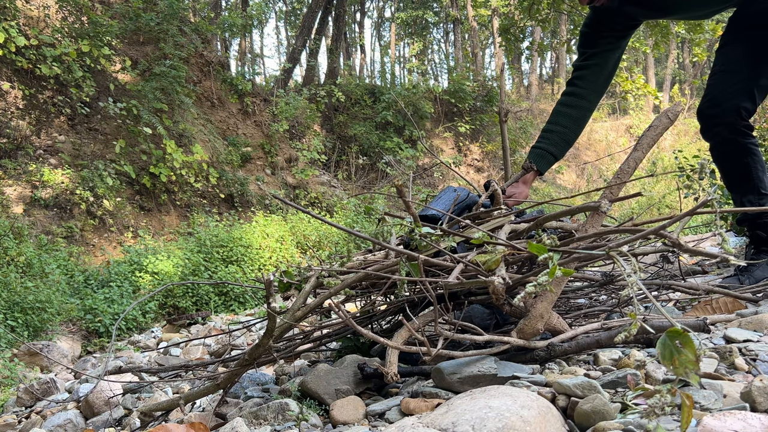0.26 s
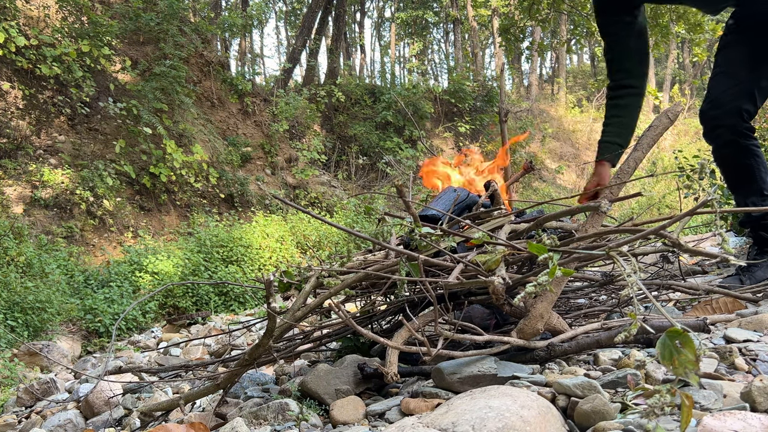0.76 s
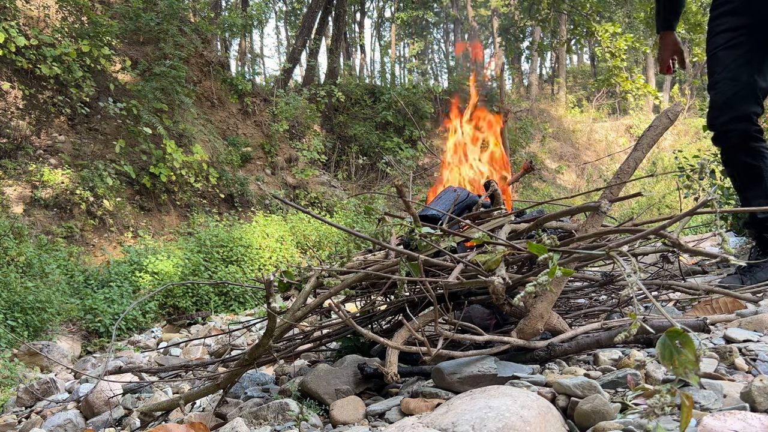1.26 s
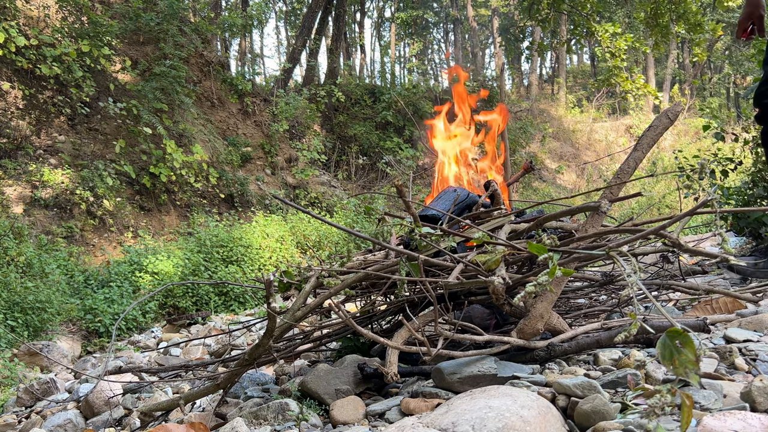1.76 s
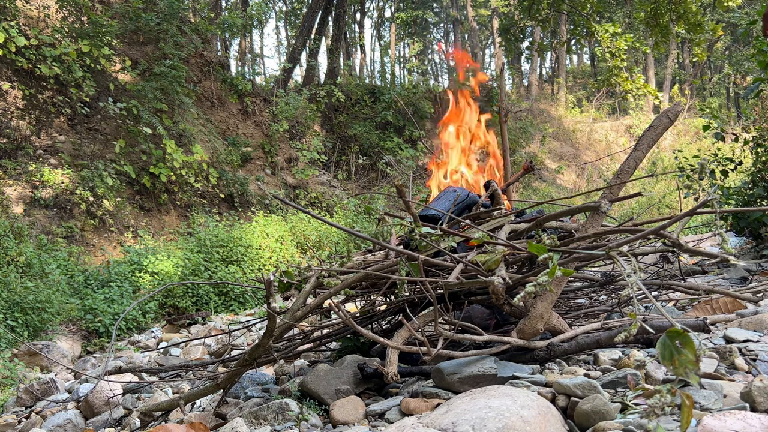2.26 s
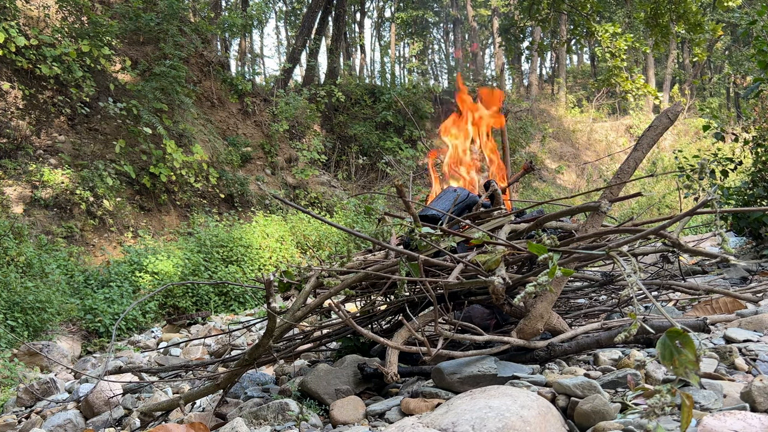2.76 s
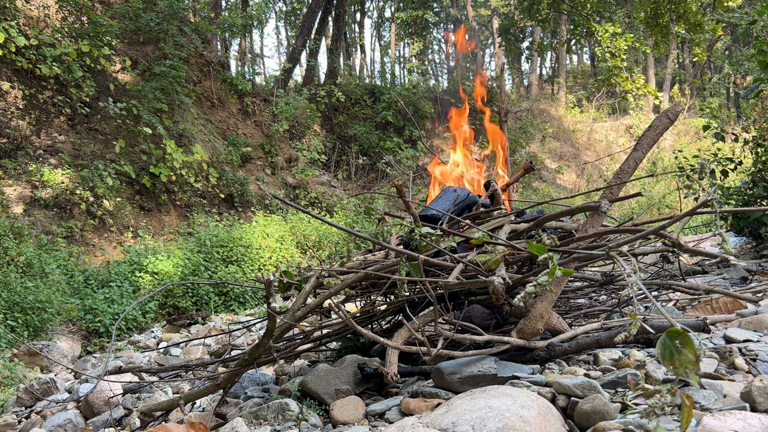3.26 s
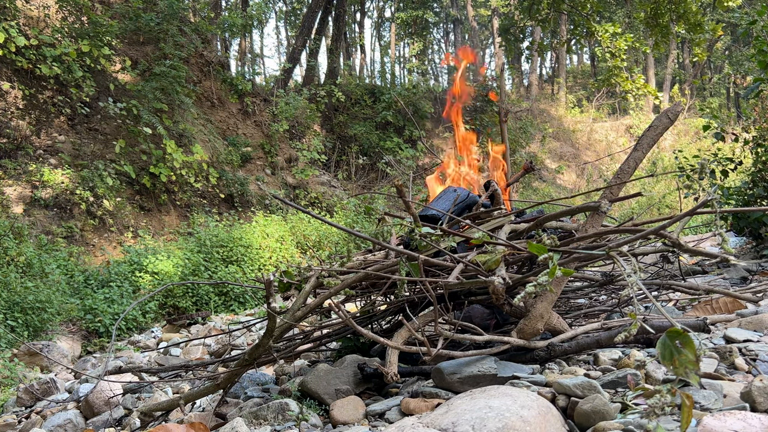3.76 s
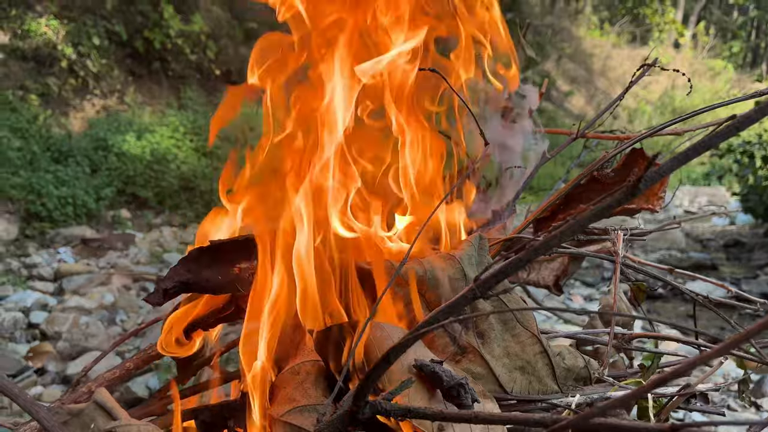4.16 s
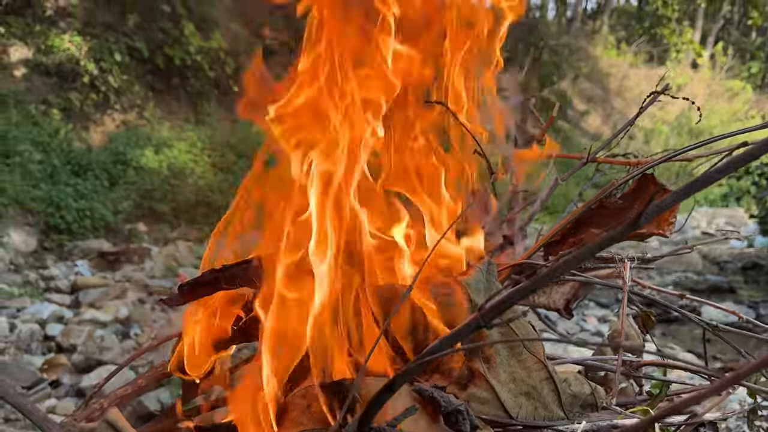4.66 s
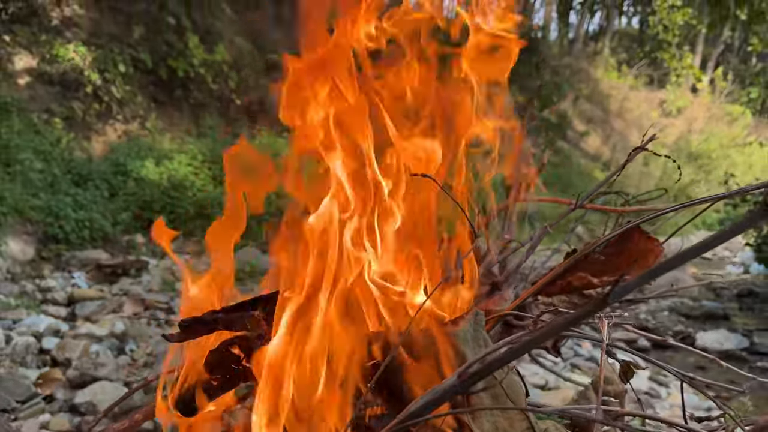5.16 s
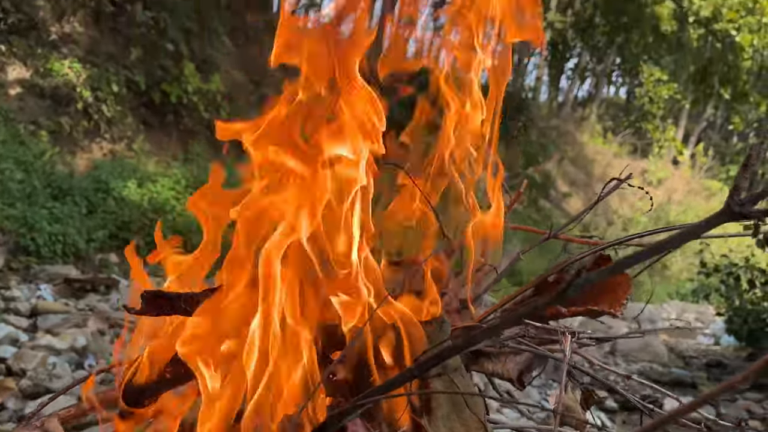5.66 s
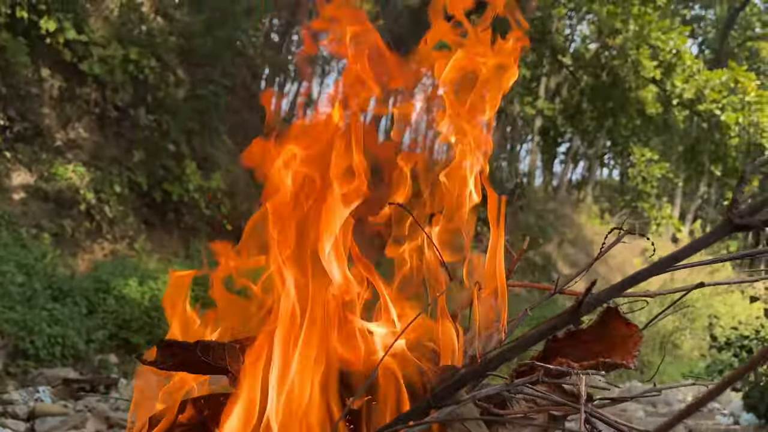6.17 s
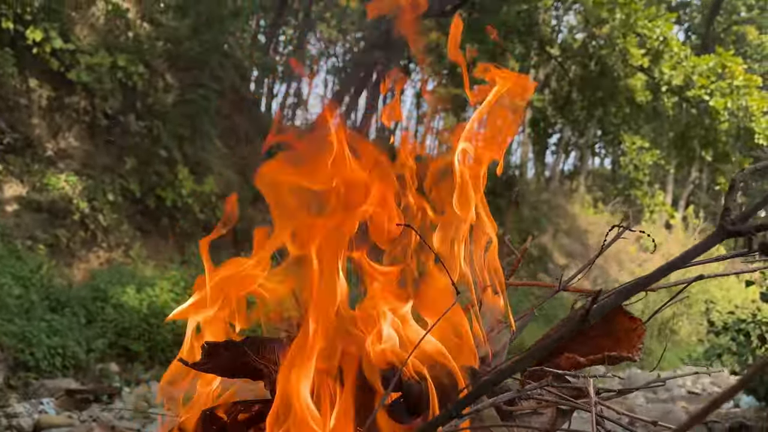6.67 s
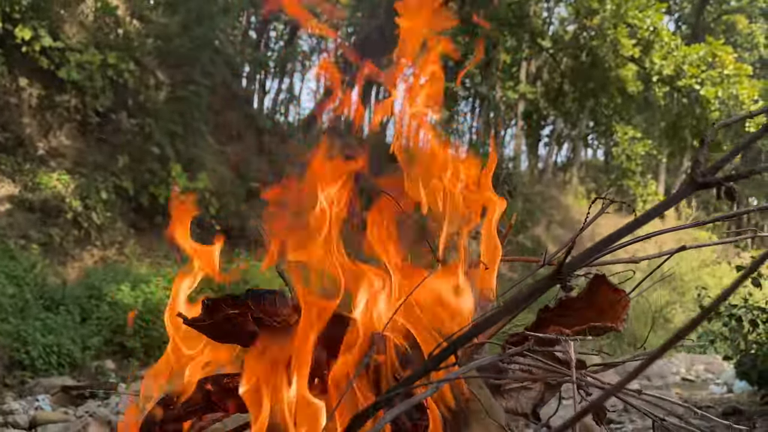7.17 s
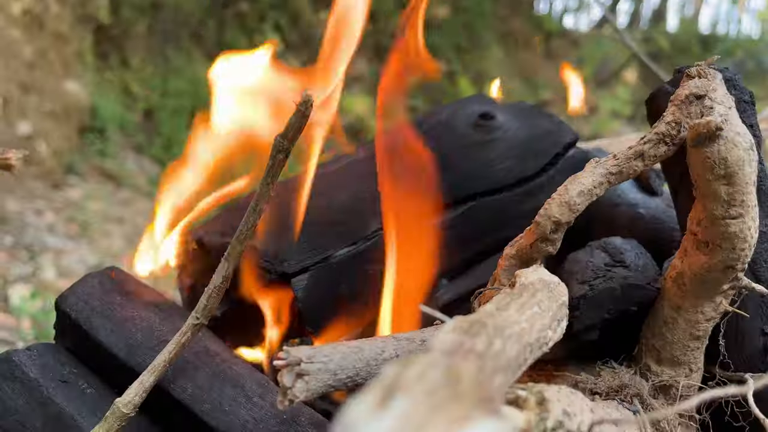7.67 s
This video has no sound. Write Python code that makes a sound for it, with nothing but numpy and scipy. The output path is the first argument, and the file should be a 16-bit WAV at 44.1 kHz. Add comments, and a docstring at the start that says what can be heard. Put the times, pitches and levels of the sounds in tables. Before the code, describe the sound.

In a stony wooded gully, a lighter snaps with a gas hiss and the fuel catches in a soft low whoof. Feet knock stones, a tiny metal clink sounds, and sparse ticks dot a quiet flutter heard from a distance. Then the microphone is abruptly close: full rushing flames and dense, sharp popping, with a last moment of lower, softer fluttering among embers.

```python
"""A stony gully with an earth bank and trees: a heap of dry branches is lit with a lighter.
The lighter clicks and its gas hisses, the fuel puffs alight, feet knock stones, and a metal part clinks in a whistle.
The microphone stands back, then close to the blaze, and last among the embers.
Flames are four layers of shaped noise; twigs pop, tick and toot as short noise bursts, stones ring as damped sines.
The bank throws each pop back a few milliseconds later, and the trees add a short tail."""
import sys
import numpy as np
from scipy import signal
from scipy.fft import rfft, irfft, next_fast_len
from scipy.io import wavfile
from scipy.ndimage import uniform_filter1d, map_coordinates

SR = 44100
rng = np.random.default_rng(int(sys.argv[2]) if len(sys.argv) > 2 else 0)


def file_out(sig):
    """Save sig as 16-bit WAV at sys.argv[1]."""
    # one column per channel
    cols = np.atleast_2d(sig).T
    # limit, then scale
    lim = np.clip(cols, -1, 1)
    pcm = np.round(lim * 32767).astype(np.int16)
    wavfile.write(sys.argv[1], SR, pcm)


N = 349272

# Relative noise colours of the flame layers: [f/Hz, power density/dB]
ROAR_COLOUR = [(15, -82), (25, -17), (52, -4.5), (70, 0), (156, -11.5), (300, -21), (390, -27), (660, -120)]
FLUTTER_COLOUR = [(110, -33), (180, 3), (319, -3.5), (404, -0.5), (813, -9.5), (1200, -21), (1560, -30.5),
                  (2640, -120)]
EMBER_FLUTTER_COLOUR = [(90, -29), (150, -0.5), (430, -5.5), (900, -10.5), (1600, -16), (2000, -27),
                        (3400, -57), (5700, -120)]
RUSH_COLOUR = [(530, -32), (900, -7), (1050, 0), (1590, -0.5), (2620, -7), (5000, -29.5), (6500, -44),
               (11000, -120)]
FAR_HISS_COLOUR = [(1470, -34), (2500, -1), (6100, -2), (7860, -6), (8980, -9.5), (13700, -6.5),
                   (14700, -20), (16500, -28)]
NEAR_HISS_COLOUR = [(1470, -13), (2500, 6.5), (5050, 8.5), (8170, -7), (8980, 3.5), (12600, -2), (14800, 0),
                    (15600, -22), (16500, -49)]
# How the fire burns, before puff, swells and wobble: [t/s, roar level/dB, hiss level/dB]
FIRE_LEVELS = [(0, -68, -79.5), (.3, -67, -73), (.65, -56, -75.5), (.9, -60.5, -73.5), (1.12, -58, -74),
               (1.27, -60.5, -74), (1.52, -56, -72), (2.0, -59.5, -75.5), (2.6, -58, -72), (3.4, -60, -78),
               (3.84, -61, -69.5), (3.86, -41.5, -62.5), (3.93, -38.5, -55.5), (4.1, -43.5, -58),
               (4.37, -40.5, -57.5), (4.6, -46, -56), (4.8, -46, -55.5), (5.2, -45.5, -55.5),
               (5.7, -45.5, -54), (6.2, -49.5, -54.5), (6.4, -48.5, -55), (6.8, -47, -55), (7.0, -47, -58),
               (7.3, -49, -57.5), (7.68, -48.5, -55.5), (7.7, -44, -58), (7.75, -47, -56), (7.83, -40, -60),
               (7.92, -50, -57.5)]
# Rows afar, close, among the embers: [usual hiss level/dB, flutter level/dB, rush level/dB]
PLACE_LEVELS = [(-73, -65, -68), (-55, -52.5, -55.5), (-53.5, -44.5, -59.5)]
# The flutter swells or sinks briefly: [middle t/s, gain/dB, half length/s]
FLUTTER_SWELLS = [(0.101, 1.5, 0.036), (0.71, 3.5, 0.063), (1.026, 13, 0.061), (1.148, 11, 0.054),
                  (1.36, 14, 0.12), (1.835, 9, 0.13), (2.225, 10, 0.056), (2.452, 4, 0.041),
                  (2.62, 3.5, 0.062), (3.08, 4.5, 0.18), (4.388, 3.5, 0.071), (5.28, 4, 0.087),
                  (5.262, 6, 0.02), (5.735, 5.5, 0.22), (5.543, -1.5, 0.028), (6.368, -12, 0.036),
                  (6.448, 5, .05), (6.65, -5.5, 0.13), (7.14, -5, 0.048), (7.186, 2, 0.019),
                  (7.368, -1.5, 0.03), (7.696, -8, 0.026)]

# Likeness of the two channels: [f/Hz, correlation 0-1]
STEREO_LIKENESS = [(60, 1), (250, 0.85), (500, 0.45), (1000, 0.29), (3000, 0.057), (8000, 0.46),
                   (13000, 0.67)]
# Close to the fire the left channel leads: [f/Hz, phase/rad]
NEAR_LEAD = [(30, 0), (300, .3), (700, 1), (1290, 2.2), (1890, 3.8), (2330, 4.1), (2840, 2.7), (3360, 2.9),
             (4740, 8.5), (6980, 11.3), (8100, 9.3), (10800, 6.8), (13000, 5.6), (15100, 3.2)]
# Left-right lean of the flames at close range: [f/Hz, level difference/dB]
FLAME_LEAN = [(60, -1), (180, -0.5), (550, 1), (1650, -0.5), (4970, 5), (15000, -3)]

# A faint thin whistle around the clink: [f/Hz, level/dB, middle t/s, half length/s]
WHISTLE_TONES = [(3570, -77, 2.24, .16), (7000, -74, 2.27, .08)]
# Stones knock underfoot: [t/s, relative level/dB, f/Hz, t60/s]
STONE_KNOCKS = [(1.112, -35.5, 215, 0.02), (1.173, -45, 213, 0.054), (1.283, -23.5, 330, 0.027),
                (2.2, -43, 193, 0.063), (2.239, -40, 434, 0.022), (3.013, -39.5, 321, 0.042),
                (3.112, -46.5, 347, 0.036)]
# Modes of a small metal part: [f/Hz, level/dB, t60/s]
CLINK_MODES = [(3440, -65, 0.083), (6820, -50, 0.1), (8200, -56, .03), (10830, -42, 0.042),
               (11700, -47, 0.033)]
# Modes of the lighter's plastic shell: [f/Hz, level/dB, t60/s]
SHELL_MODES = [(2190, -24.5, 0.011), (5020, -46, 0.068)]
# The lighter's gas, levels relative:
# [crack level/dB, brightness/dB, body level/dB, body f/Hz, left-right/dB]
GAS_BURST = (-63.5, -8.5, -39, 2000, -8)
# Resonances of a hollow twig, before the pitch ratio: [f/Hz, width/Hz, relative level/dB]
TWIG_RESONANCES = [(787, 55, 6), (940, 180, 4.5), (1220, 24, 4.5)]
# Steam toots: [t/s, level/dB, half length/s, pitch ratio]
STEAM_TOOTS = [(4.855, -34, 0.017, 0.99), (5.249, -39.5, 0.015, 0.93), (5.262, -42, 0.037, 2.47),
               (5.441, -40.5, 0.041, 1.45), (5.586, -41, 0.0064, 1.38)]
# The lighter's click, then bursting wood cells, levels relative:
# [t/s, crack level/dB, brightness/dB, body level/dB, body f/Hz, left-right/dB]
CLICK_AND_POPS = [(0.3109, -32.5, -3.5, 4, 2600, -4.5), (0.6319, -51.5, 4, 5, 2600, -3),
                  (0.932, -54, -1, -19, 1800, -1), (0.9549, -46, -9, -14, 1500, 3),
                  (1.0163, -59.5, 5, 18, 840, -6), (1.1334, -56.5, -26, 19.5, 1800, -4),
                  (1.2837, -33.5, -18, -3.5, 2110, -2), (1.425, -35, -31, -1, 2200, -3),
                  (1.5216, -54.5, -1, -10, 1500, 2), (1.5405, -55, -7, -12, 890, 2),
                  (1.9217, -56.5, 1, -9, 680, 0), (2.229, -61, 1, 12, 2450, -5),
                  (2.2358, -48.5, -1, 4.5, 1120, -1), (2.3, -57, 7, 9, 1180, 1),
                  (2.3351, -66, 4, 9, 1870, 2), (2.416, -56, 3.5, -15, 890, -2),
                  (2.5347, -53.5, 5, -12, 2150, 0), (2.562, -52.5, 3.5, 0, 1850, -3),
                  (2.7458, -37, 4.5, 5, 2280, -1), (3.0391, -60, -9, 17, 500, 1),
                  (3.1665, -57.5, 7, 5, 1170, 1), (3.353, -57, 0.5, -7, 1620, 1),
                  (3.435, -61.5, 1, 2, 1670, 0), (3.655, -52, -13, -5, 1240, -1),
                  (3.6906, -53.5, 6, 0, 1510, 1), (3.726, -56, -24, -5, 1930, 3),
                  (3.7522, -57.5, 5, 6, 2050, 1), (3.9064, -49, 5, -13, 1520, 4),
                  (3.991, -39.5, 3.5, -8, 1130, 5.5), (4.0057, -41, -2, 2, 1330, 4),
                  (4.1106, -52, 6, 3, 540, 3), (4.152, -35.5, 4.5, 0, 623, 0),
                  (4.216, -49, 4, -12, 1380, 10), (4.2783, -45.5, 10, -1, 1700, 2),
                  (4.284, -38, 6, 1.5, 1090, 4), (4.3224, -48, 5, 4, 2600, 2),
                  (4.3864, -47, 7, -6, 1430, 5), (4.4215, -44.5, 13, -9, 1000, 4),
                  (4.4363, -35.5, 10.5, 2, 1250, 7.5), (4.4687, -26.5, 1, -5, 990, 8),
                  (4.5012, -44.5, 14.5, 8, 880, 3), (4.524, -41, 6, 1, 1030, 4.5),
                  (4.5549, -42, 5, 0.5, 850, 7.5), (4.625, -39.5, 5, 2.5, 960, 7),
                  (4.632, -37.5, 0, 4, 746, 6), (4.684, -53, 13, 11, 510, 0),
                  (4.738, -28, -0.5, -3, 960, -0.5), (4.7547, -41.5, 14, 4, 590, 12),
                  (4.786, -34.5, 3.5, 0, 800, 2), (4.8273, -36, 4, -10, 1250, 2.5),
                  (4.8456, -37.5, 9, 2, 700, 8), (4.8733, -38.5, 8.5, -9, 900, 4.5),
                  (4.8973, -54, 15, 6, 880, 1), (4.923, -38, 0, -2, 1090, 5.5),
                  (4.9502, -40, 6.5, 2, 1080, 3), (4.999, -45, 3, 2, 950, 5), (5.0122, -48, 8.5, 5, 925, 5),
                  (5.107, -41.5, -2, 5, 1000, 2.5), (5.1902, -42, -1, -5, 600, 7),
                  (5.2332, -40, -7, -1, 1250, 7), (5.265, -35.5, 4, -2, 2120, 3),
                  (5.3074, -26.5, 4.5, -1.5, 740, 2.5), (5.34, -27, 0, -3, 544, 3),
                  (5.3866, -34, 6, -3, 1240, 6), (5.4118, -21.5, 4, -5.5, 850, 2.5),
                  (5.4673, -23, 0.5, -6.5, 1070, 4.5), (5.5573, -34.5, 1, -6.5, 1440, 3.5),
                  (5.6417, -34, 9, 2.5, 870, 0), (5.6533, -34.5, 3, 2.5, 755, 8),
                  (5.7712, -41, 6, -1, 880, 6), (5.7922, -56.5, 17, 16, 540, 9),
                  (5.829, -45, 14, 7, 670, 3), (5.8486, -29, 3.5, -2, 835, 4.5),
                  (5.8737, -23, 2, 0, 1170, 4), (5.9113, -39, 12, 9, 580, 11.5),
                  (5.9206, -37, 1, 7, 870, 6), (5.9818, -50, 1, 5, 1040, 4), (6.0035, -36, -1.5, 2, 694, 5),
                  (6.0778, -45.5, 11, 7, 650, 7.5), (6.1161, -30.5, 2.5, 3, 1240, 9),
                  (6.1328, -55, 7, 1, 1800, 0), (6.1493, -29.5, 4.5, -0.5, 760, 4.5),
                  (6.1861, -36.5, 7, -8, 930, 7.5), (6.2419, -23, 1, 0, 1260, 7),
                  (6.2544, -23.5, 2, -2, 980, 2), (6.2723, -26.5, 3, 0, 1280, 6),
                  (6.3215, -37.5, 5.5, 0, 1300, 5.5), (6.364, -25.5, 0.5, 2.5, 1270, 6.5),
                  (6.4451, -37.5, -8, -11, 1150, 5), (6.4785, -26, 2, -5, 920, 2),
                  (6.5605, -41.5, 7, 0, 2130, 3.5), (6.5993, -41, 3, -2, 1690, -2),
                  (6.6142, -50, 15, -5, 1270, 10), (6.6605, -35.5, 4.5, 0, 1370, 3.5),
                  (6.7338, -30.5, 3.5, -2.5, 1130, 4.5), (6.7597, -47, 7, -5, 980, 4),
                  (6.8132, -42, 3, -3, 1060, 7), (6.8225, -38, 8, -15, 1000, 6),
                  (6.8282, -31.5, 3, -4, 990, 5.5), (6.8352, -19.5, -1, 2.5, 1410, 7),
                  (6.869, -33.5, 2.5, 0, 1070, 6), (6.9159, -34.5, 10.5, -4, 950, 9.5),
                  (6.9913, -39.5, 3, 3, 1100, 2), (7.0172, -34.5, 9.5, -1.5, 930, 8.5),
                  (7.0306, -52, 18, -10, 1110, 0), (7.077, -43, -3, 2.5, 1060, 4),
                  (7.127, -37, -4, -0.5, 930, 3), (7.149, -36.5, 3, -2.5, 940, 4.5),
                  (7.1671, -53, 10, 4, 1130, 11), (7.1847, -30, -4, -10, 1240, 3.5),
                  (7.202, -32.5, 5, 4, 1030, 9), (7.2454, -35.5, 1, -3, 1190, 6),
                  (7.2634, -36, 9.5, 0.5, 940, 10.5), (7.296, -25.5, 1, -5, 990, 3),
                  (7.3327, -30.5, 1, -2, 940, 2), (7.396, -40, -11, 7.5, 720, 5.5),
                  (7.4425, -34.5, 7.5, -0.5, 940, 1), (7.455, -34, -2, -6, 870, 11.5),
                  (7.4767, -33.5, 7.5, 3, 835, 0), (7.4834, -35, 6, -2, 1370, 10),
                  (7.5663, -46.5, -2, 6.5, 1890, 4), (7.5795, -39.5, 6.5, -5, 1270, 5.5),
                  (7.5985, -57, 13, -4, 1230, 6), (7.6356, -37, 4, -1, 1300, 11.5),
                  (7.6489, -38, 0, -9, 1660, -8), (7.6633, -27, 1.5, -2.5, 725, 3.5),
                  (7.7222, -38.5, -12, 5, 694, 2), (7.7683, -47, -5, 5, 1530, -3),
                  (7.816, -45.5, -11, 9, 640, 1), (7.8433, -51, -2, 20, 890, 5),
                  (7.8514, -40.5, -11, 2, 880, 5)]
# Colour shared by every pop: [f/Hz, relative level/dB]
POP_COLOUR = [(150, -29), (500, 5), (1500, 0), (3700, 4.5), (6500, 1.5), (8100, 2.5), (10000, 4.5),
              (13000, 8), (15500, 3), (17000, -35)]
# Colour of what bank and trees return: [f/Hz, relative level/dB]
BANK_COLOUR = [(500, -18), (1500, -8), (3500, -2.5), (6500, 2), (11000, -7.5), (16000, -15)]

CLOSER_S, EMBERS_S = 3.85, 7.69  # the microphone is close, then among the embers
FAR_LAG_S = 0.0002005  # left lags right from afar
TOP_HZ = 17400
PUFF_AT_S, PUFF_RISE_S, PUFF_HOLD_S, PUFF_FALL_S = 0.332, 0.031, 0.18, 0.087
PUFF_ROAR_DB, PUFF_FLUTTER_DB, PUFF_RUSH_DB = 22, 16.5, 6.5  # full gains, before any dulling
PUFF_SAG = 0.83  # share of the gain in dB left at the end of the hold
PUFF_DULLS_S = 0.42  # time constant of the puff's gain in flutter and rush
FLUTTER_FOLLOWS = 0.31  # dB per dB of hiss
RUSH_FOLLOWS = (0.14, 2.8, 0.46)  # dB per dB of hiss: afar, close, among the embers
SWELL_RUSH, SWELL_HISS = 0.16, 0.55  # shares of a swell's dB in the higher layers
CLINK_AT_S = 2.233
GAS_LAG_S = 0.003  # after the click
SHELL_LOW_HZ = 1500  # the small shell radiates little of the click below this
AFTER_POP, AFTER_S = 0.45, 0.037  # share of close ticks that trail a pop, and their mean lag before the cap
FAR_BODY_FALL_DB, NEAR_BODY_FALL_DB = 12, 3  # fall of a pop's body one octave off its centre


def amp(db):
    """Decibels become an amplitude factor."""
    return 10 ** (np.asarray(db) / 20)


def unit(x):
    """Scale to an rms of 1."""
    return x / np.sqrt(np.mean(x ** 2) + 1e-20)


def along(points, hz):
    """Read a curve of (f/Hz, value) points on a log frequency axis."""
    f, value = np.transpose(points)
    return np.interp(np.log(hz + 1), np.log(f + 1), value)


def wobble(rate):
    """A smooth random curve with rate knots a second."""
    knots = rng.standard_normal(int(N * rate / SR) + 4)
    return map_coordinates(knots, [np.arange(N) * rate / SR])


def ports(pair, hz, near, pan_db):
    """Unrelated spectra become left and right: partly alike, phase-shifted by the microphone body or lagging."""
    turn = np.arccos(np.clip(along(STEREO_LIKENESS, hz), -1, 1)) / 2
    mid = pair[0] * np.cos(turn)
    side = pair[1] * np.sin(turn)
    lead = np.where(near, along(NEAR_LEAD, hz), -2 * np.pi * hz * FAR_LAG_S)
    half = amp(pan_db / 2) * np.exp(0.5j * lead)  # half of lean and lead goes to each side
    return np.array([(mid + side) * half, (mid - side) / half])


def ring(s, modes, attack):
    """A struck body rings from time s as damped sines of (f/Hz, level/dB, t60/s)."""
    t = np.maximum(np.arange(N) / SR - s, 0)
    tones = sum(amp(db - 60 * t / t60) * np.sin(2 * np.pi * hz * t) for hz, db, t60 in modes)
    return tones * (1 - np.exp(-t / attack))


def turbulence(colour, patchy_db):
    """Turbulent gas as coloured stereo noise of rms 1, with random gain patches over time and frequency."""
    hz, t, noise = signal.stft(rng.standard_normal((2, N)), SR, nperseg=1024)
    hz, near = hz[:, None], t > CLOSER_S
    patches = uniform_filter1d(rng.standard_normal(noise.shape[1:]), size=20, axis=0)
    patches = uniform_filter1d(patches, size=3, axis=1)
    patchy = noise * amp(patchy_db * unit(patches))
    stereo = ports(patchy, hz, near, along(FLAME_LEAN, hz) * near)
    pair = signal.istft(stereo, SR, nperseg=1024)[1][:, :N]
    gain = amp(along(colour, np.fft.rfftfreq(N, 1 / SR)))
    return unit(irfft(rfft(pair) * gain, N))


def flame_levels():
    """Roar, flutter, rush and hiss in dB per sample, following place, puff and swells."""
    t = np.arange(N) / SR
    s, roar_db, hiss_db = np.transpose(FIRE_LEVELS)
    roar_db, hiss_db = np.interp(t, s, roar_db), np.interp(t, s, hiss_db)
    place = (t > CLOSER_S).astype(int) + (t > EMBERS_S)
    usual_db, flutter_db, rush_db = np.array(PLACE_LEVELS)[place].T
    extra_db = hiss_db - usual_db
    puff_times = np.cumsum([PUFF_AT_S, PUFF_RISE_S, PUFF_HOLD_S, PUFF_FALL_S])
    puff = np.interp(t, puff_times, [0, 1, PUFF_SAG, 0])
    bright = puff * np.exp(-np.abs(t - PUFF_AT_S) / PUFF_DULLS_S)
    swell_db = sum(db * np.exp(-((t - mid) / half) ** 2) for mid, db, half in FLUTTER_SWELLS)
    roar_db = roar_db + PUFF_ROAR_DB * puff
    flutter_db = flutter_db + FLUTTER_FOLLOWS * extra_db + PUFF_FLUTTER_DB * bright + swell_db
    rush_db = rush_db + np.array(RUSH_FOLLOWS)[place] * extra_db
    rush_db = rush_db + PUFF_RUSH_DB * bright + SWELL_RUSH * swell_db
    return roar_db, flutter_db, rush_db, hiss_db + SWELL_HISS * swell_db


def flames():
    """Turbulent burning: roar, flutter and rush share a slow flap; rush and hiss share a faster sizzle."""
    roar_db, flutter_db, rush_db, hiss_db = flame_levels()
    t = np.arange(N) / SR
    flap, sizzle = wobble(9), wobble(30)
    roar_db = roar_db + 0.43 * flap + 0.51 * wobble(25)
    flutter_db = flutter_db + 0.68 * flap + 1.5 * wobble(45) + 2.27 * wobble(110)
    rush_db = rush_db + 1.25 * flap + 0.4 * sizzle + 0.53 * wobble(110)
    hiss_db = hiss_db + 2.0 * sizzle + 1.9 * wobble(7)
    roar = turbulence(ROAR_COLOUR, patchy_db=0.43)
    ember_flutter = turbulence(EMBER_FLUTTER_COLOUR, patchy_db=1.5)
    flutter = np.where(t > EMBERS_S, ember_flutter, turbulence(FLUTTER_COLOUR, patchy_db=2.0))
    rush = turbulence(RUSH_COLOUR, patchy_db=1.0)
    near_hiss = turbulence(NEAR_HISS_COLOUR, patchy_db=2.5)
    hiss = np.where(t > CLOSER_S, near_hiss, turbulence(FAR_HISS_COLOUR, patchy_db=2.8))
    return amp(roar_db) * roar + amp(flutter_db) * flutter + amp(rush_db) * rush + amp(hiss_db) * hiss


def whistle():
    """Thin sines, wavering in level and phase, swell and fade."""
    t = np.arange(N) / SR
    out = np.zeros(N)
    for hz, db, mid, half in WHISTLE_TONES:
        tone = amp(2.5 * wobble(39.2)) * np.sin(2 * np.pi * hz * t + 0.89 * wobble(120))
        out += amp(db) * np.exp(-((t - mid) / half) ** 2) * tone
    return out


def stones():
    """Stones knock hollow underfoot, each with a weaker overtone, and a small metal part clinks."""
    out = ring(CLINK_AT_S, CLINK_MODES, attack=0.0016)
    for s, db, hz, t60 in STONE_KNOCKS:
        modes = [(hz, db + 6.5, t60), (1.62 * hz, db - 6.0, 1.15 * t60)]
        out = out + ring(s, modes, attack=0.0025)
    return out


def lighter():
    """A click rings the plastic shell, then gas hisses out as a burst with a long tail."""
    click_at = CLICK_AND_POPS[0][0]
    click = pops(CLICK_AND_POPS[:1], size=16384, echo=0.22, tail=0.46, tail_t60=0.15)
    highpass = signal.butter(4, SHELL_LOW_HZ, "high", fs=SR, output="sos")
    click = signal.sosfilt(highpass, click)
    shell = ring(click_at, SHELL_MODES, attack=0.00045)
    gas = pops([(click_at + GAS_LAG_S, *GAS_BURST)], size=16384, echo=0, tail=3.3, tail_t60=0.65)
    return click + shell + gas


def toots():
    """Short jets of steam: noise sounds a hollow twig's resonances."""
    out, size = np.zeros((2, N)), 8192
    t = (np.arange(size) - size // 2) / SR
    hz = np.fft.rfftfreq(size, 1 / SR)
    for s, db, half, ratio in STEAM_TOOTS:
        f = hz / ratio
        tube = 0
        for centre, width, level in TWIG_RESONANCES:
            damping = 1j * f * width
            tube = tube + amp(level) * (damping / (centre * centre - f * f + damping)) ** 1.1
        jet = unit(irfft(rfft(rng.standard_normal((2, size))) * tube, size))
        start = round(s * SR) - size // 2
        out[:, start:start + size] += amp(db) * np.exp(-(t / half) ** 2) * jet
    return out


def crackle(count):
    """Fine ticks follow the hiss level, a few standing out; dense at close range, thickest just after pops."""
    draw = rng.random((count, 8))
    bursts = np.array([row[0] for row in CLICK_AND_POPS if CLOSER_S < row[0] < EMBERS_S])
    parents = bursts[(draw[:, 0] * len(bursts)).astype(int)]
    trailing = np.minimum(parents - AFTER_S * np.log(1 - draw[:, 6]), EMBERS_S)
    scattered = CLOSER_S + draw[:, 0] * (EMBERS_S - CLOSER_S)
    close = np.where(draw[:, 7] < AFTER_POP, trailing, scattered)
    s = np.where(draw[:, 5] < 0.07, draw[:, 0] * CLOSER_S, close)  # a few ticks are heard from afar
    hiss_db = flame_levels()[3][(s * SR).astype(int)]
    db = hiss_db + 4.5 - 3.5 * np.log(0.11 + draw[:, 1])
    crack_db = db - 8 * draw[:, 2]
    bright_db = 8 * draw[:, 2] - 5 * draw[:, 3]
    body_db = 3 - 6 * draw[:, 6]
    body_hz = 700 * 2 ** (0.92 * draw[:, 3])
    rows = np.transpose([s, crack_db, bright_db, body_db, body_hz, 4 * draw[:, 4]])
    return pops(rows, size=2048, echo=0.092, tail=0.025, tail_t60=0.021)


def pops(rows, size, echo, tail, tail_t60):
    """A sharp noise burst with a few ms of splintering, then the bank's coloured return and the trees' tail."""
    early = 256  # samples of room before each onset
    s, crack_db, bright_db, body_db, body_hz, pan_db = np.transpose(rows)[:, :, None]
    t = (np.arange(size) - early) / SR
    hz, near = np.fft.rfftfreq(size, 1 / SR), s > CLOSER_S

    def dying(start, t60):
        """Silence until start, then an exponential decay."""
        return (t >= start) * amp(-60 * np.abs(t - start) / t60)

    def noise():
        """Fresh noise for two channels and every pop."""
        return rng.standard_normal((len(rows), 2, size)).swapaxes(0, 1)

    def under(edge_hz):
        """Share of the spectrum below a soft edge."""
        return 1 / (1 + (hz / edge_hz) ** 8)

    body, treble = under(2570), 1 - under(7060)
    crack = 1 - body - treble
    fall_db = np.where(near, NEAR_BODY_FALL_DB, FAR_BODY_FALL_DB)
    hump_db = body_db - fall_db * np.log2((hz + 1) / body_hz) ** 2
    band_db = body * (hump_db + 10.5) + crack * 4.85 + treble * (bright_db + 0.5)
    colour = amp(along(POP_COLOUR, hz) + crack_db + band_db)
    lean_db = pan_db * (0.62 * body + 2.36 * crack)

    rise = 1 - np.exp(-np.abs(t) / 0.0002)
    splinter = rise * (dying(0, 0.0052) + 0.42 * dying(0, 0.037))
    direct = ports(rfft(noise() * splinter), hz, near, lean_db)

    delay = np.where(near, 0.0098, 0.0066)
    bank = echo * (dying(delay, 0.024) + 0.2 * dying(delay, 0.055))
    trees = tail * dying(0.0006, tail_t60)
    back = ports(rfft(noise() * (bank + trees)), hz, near, -0.3 * lean_db)  # leans to the other side
    sound = irfft(colour * (direct + back * amp(along(BANK_COLOUR, hz))), size)
    sound = sound * ((s > EMBERS_S) | (s + t < EMBERS_S))  # moving to the embers ends earlier tails

    # Samples outside the scene collect in one spare slot or at sample 0.
    at = np.clip(np.round(s * SR).astype(int) - early + np.arange(size), 0, N)
    return np.array([np.bincount(at.ravel(), side.ravel(), N + 1)[:N] for side in sound])


def twigs():
    """Wood cells burst in the heat, each as a pop with its own body resonance."""
    return pops(CLICK_AND_POPS[1:], size=8192, echo=0.32, tail=0.12, tail_t60=0.22)


def scene():
    """Layer the fire, the handling sounds and the bursting wood."""
    handling = whistle() + stones() + lighter()
    return flames() + handling + toots() + crackle(count=800) + twigs()


def record(dry):
    """The recorder keeps nothing above its band limit."""
    size = next_fast_len(N + 8192)
    kept = np.fft.rfftfreq(size, 1 / SR) < TOP_HZ
    return irfft(rfft(dry, size) * kept, size)[:, :N]


dry = scene()
out = record(dry)
file_out(out)
```